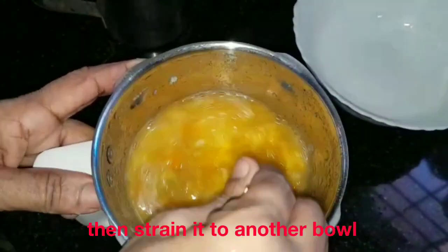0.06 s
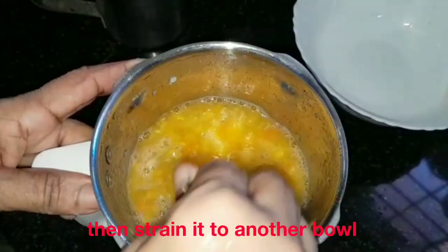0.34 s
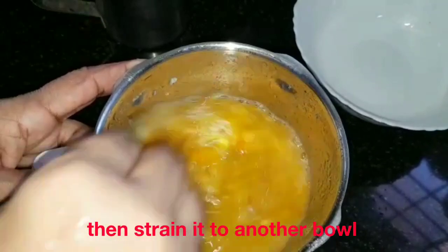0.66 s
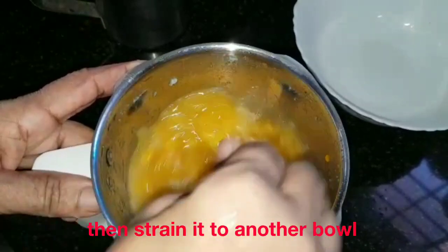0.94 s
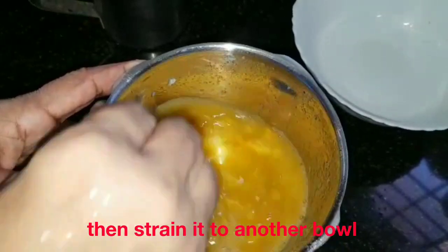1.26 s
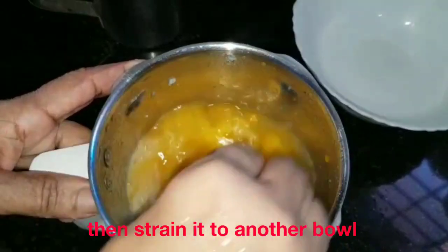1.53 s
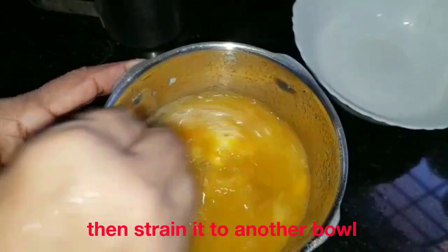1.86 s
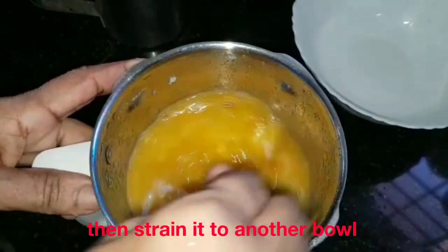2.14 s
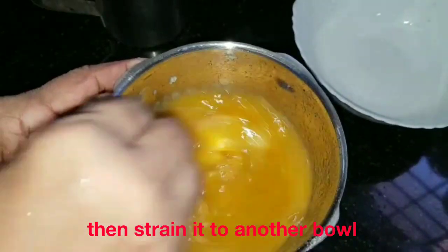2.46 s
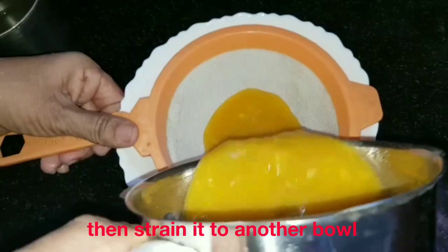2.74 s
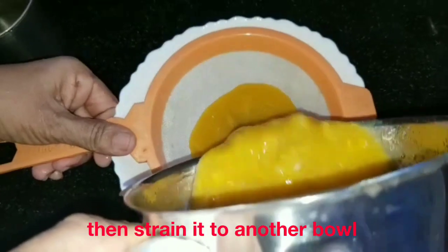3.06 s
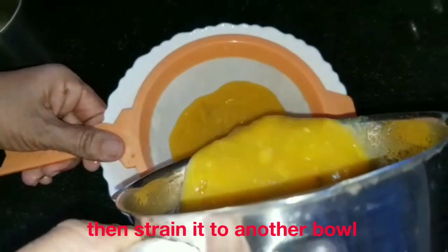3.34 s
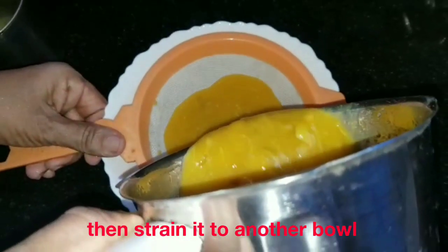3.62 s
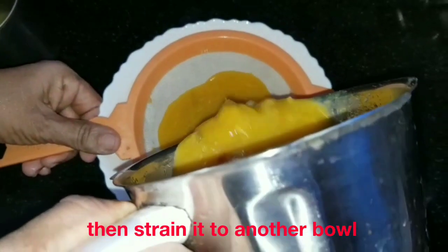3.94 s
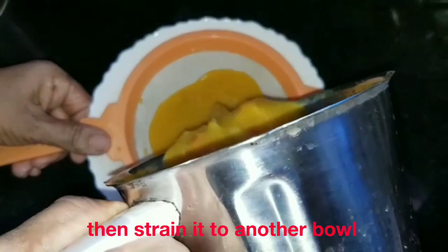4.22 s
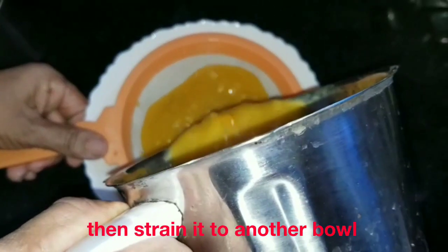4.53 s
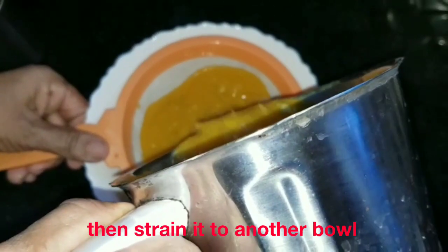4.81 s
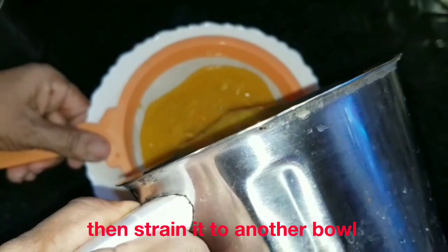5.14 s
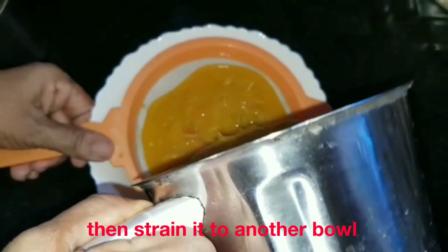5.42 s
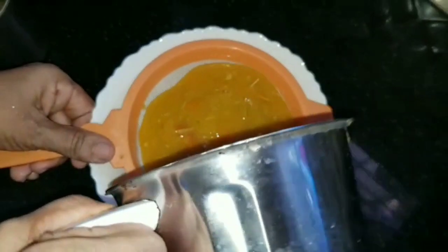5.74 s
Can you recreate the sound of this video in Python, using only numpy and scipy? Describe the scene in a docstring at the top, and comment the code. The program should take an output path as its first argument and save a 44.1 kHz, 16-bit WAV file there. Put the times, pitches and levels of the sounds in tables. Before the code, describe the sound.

Close up in a small kitchen, wet paste gurgles and smacks as fingers work it around a metal jar, air pockets popping with a short hollow ring. The stirring cuts off, and the paste starts sliding out into a plastic strainer: first quiet, sticky ticks, then a run of wet plops as blobs fall from the rim. A faint hum and room rumble lie underneath.

```python
"""Wet vegetable paste is stirred by hand in a steel blender jar: air pockets pop, the paste squelches, and the
air modes of the jar resonate. Then the scene changes, after a brief gap of total silence: the jar pours into a
plastic strainer, blobs tear off and plop, and the sliding film crackles. The pitched sounds are damped
oscillations of enclosed air; the smacks and clicks are ruptures of wet film. A small kitchen reverberates
around them, with a faint rumble and a low hum that swells at the start and again during the pour."""
import sys
import numpy as np
from scipy import signal
from scipy.fft import rfft, irfft, next_fast_len
from scipy.io import wavfile
from scipy.ndimage import uniform_filter1d, map_coordinates

SR = 44100
rng = np.random.default_rng(int(sys.argv[2]) if len(sys.argv) > 2 else 0)


def inscribe(sig):
    """Save sig as 16-bit PCM at rate SR to the path in sys.argv[1].

    A 1-D sig is mono; a 2-D sig holds one channel per row.
    Samples are clipped to [-1, 1] before scaling.
    """
    pcm = np.round(np.clip(np.atleast_2d(sig).T, -1, 1) * 32767)
    wavfile.write(sys.argv[1], SR, pcm.astype(np.int16))


N = 254633
TIME = np.arange(N) / SR

# Paste squeezed between the fingers:
# (centre time [s], Gaussian width [s], level [dB], relative spit level [dB], spit resonance [Hz])
SQUEEZES = [(0.01, 0.016, -44, -3.5, 2690), (1.109, 0.028, -46.5, 3, 4630), (1.19, 0.016, -43, 1.5, 3800),
            (1.807, 0.0081, -37.5, -3.5, 4740), (1.86, 0.014, -41.5, 5, 2830),
            (1.893, 0.007, -39.5, 7.5, 3160), (2.679, 0.0078, -36, -11.5, 2030)]
# Films snapping: (time [s], level [dB], relative smack level [dB], resonance [Hz])
FILM_SNAPS = [(0.033, -35.5, -3, 11370), (0.967, -34.5, -22.5, 5800), (1.03, -27, -16.5, 3220),
              (1.036, -25.5, -9.5, 6250), (1.417, -57.5, 21, 2020), (1.613, -26, -12, 3320),
              (2.2034, -27.5, -24, 12540), (2.865, -47, -18, 11430), (2.922, -40.5, -1, 2410),
              (3.002, -47, -3, 5950), (3.2002, -38.5, -3.5, 3160), (3.2912, -38, -12, 3150),
              (3.3246, -36, -19, 12000), (3.432, -46.5, -19, 10460), (3.485, -45, 4.5, 6830),
              (3.6451, -31.5, -2.5, 3010), (3.807, -31.5, 0, 5400), (3.827, -24.5, -6.5, 4770),
              (4.298, -37, -5, 6950), (4.714, -34.5, -5.5, 11500), (5.016, -35.5, -3.5, 11500),
              (5.078, -42, 3.5, 11000), (5.1551, -33, -16.5, 11500), (5.353, -34, -6, 3290),
              (5.595, -33.5, -3.5, 6140), (5.623, -36, -18, 12300)]
# Air pockets opened by the fingers; smack, snap and thud are offsets from the level:
# (time [s], level [dB], pitch [Hz], smack [dB], snap [dB], thud [dB], pitch of air under the hand [Hz])
AIR_POCKETS = [(0.188, -38, 934, -15.5, -21.5, -1.5, 418), (0.233, -36.5, 790, -27, -28.5, -7.5, 400),
               (0.488, -33.5, 785, -17, -22.5, -8, 990), (0.538, -11.5, 812, -11, -24.5, -16.5, 867),
               (0.716, -16.5, 930, -8, -21.5, -23.5, 740), (0.795, -21, 828, -17, -16.5, -18.5, 920),
               (0.829, -30, 925, -3.5, -6.5, -20, 735), (1.007, -37.5, 840, 5.5, -16, -19, 1420),
               (1.126, -19.5, 835, -5, -22.5, -20, 1273), (1.2151, -15, 1030, -12.5, -13.5, -5, 386),
               (1.2195, -10, 826, -8, -20, -21, 870), (1.283, -24, 826, -27, -30, -9, 497),
               (1.385, -27, 813, -36.5, -50, -6.5, 955), (1.59, -17, 707, -10.5, -13.5, -18, 1144),
               (1.683, -15, 784, -22.5, -30, -17.5, 422), (1.761, -18.5, 880, -13.5, -23.5, -16.5, 914),
               (1.776, -29, 766, -2, -19, -34, 850), (1.806, -21.5, 927, -21.5, -28.5, -19, 990),
               (1.928, -22.5, 804, -32, -28, -49, 820), (1.948, -30.5, 742, -6.5, -11.5, -12, 776),
               (2.194, -33, 876, -5, -20, -19, 900), (2.301, -28, 930, -9.5, -23, -10.5, 1050),
               (2.307, -26.5, 660, -17.5, -30.5, -16.5, 685), (2.477, -24, 830, -11, -24.5, -21, 816),
               (2.534, -17.5, 770, -17, -22.5, -21.5, 862), (2.638, -24, 878, -13, -26.5, -27, 1060)]
# Bubble strings drawn in behind the fingers: (start [s], end [s], first level [dB], last level [dB],
# first pitch [Hz], last pitch [Hz], first rate [1/s], last rate [1/s])
BUBBLE_STRINGS = [(0.301, 0.478, -57, -37, 730, 823, 59.7, 130.6),
                  (1.832, 1.899, -30.5, -32.5, 950, 1020, 202, 326.6)]
# Strokes of the hand: (time of full push [s], hold [s], gurgle level [dB], smear level [dB])
HAND_STROKES = [(0.8, 0.07, -56.5, -57), (1.21, 0.017, -39, -68), (1.776, 0.14, -46.5, -56.5),
                (2.264, 0.015, -45, -62.5), (2.647, 0.06, -50.5, -69)]
# Hard pushes that jolt the jar on the counter: (time [s], level [dB])
JAR_JOLTS = [(0.56, -48), (1.25, -54.5), (1.61, -54), (2.56, -56.5)]
# Air forced through gaps in the paste: (centre time [s], Gaussian width [s], level [dB], resonance [Hz])
GAP_SQUEAKS = [(0.935, 0.0079, -54.5, 1800), (2.133, 0.0034, -49.5, 1800), (3.55, 0.0029, -46, 3140)]
# Swells of the hum: (time when full [s], hold [s], level [dB])
HUM_SWELLS = [(0.28, 0.02, -58.5), (3.91, 0.54, -58.5), (4.09, 0.034, -54)]
# Hollow tones of the tipped jar: (time when full [s], hold [s], level [dB], frequency [Hz])
JAR_TONES = [(2.76, 0.061, -66.5, 437), (2.73, 0.081, -64.5, 1260), (3.066, 0.67, -75, 721),
             (3.51, 0.047, -63.5, 1240)]
# Blobs tearing off the rim; smack and snap are offsets from the level:
# (time [s], level [dB], pitch [Hz], smack [dB], snap [dB], small bubble [Hz], snap resonance [Hz])
BLOBS = [(3.635, -23.5, 1154, -14, -9.5, 2310, 5500), (3.7337, -29, 1050, -7, -1.5, 2320, 5500),
         (3.774, -23.5, 970, -9.5, -17, 2350, 6000), (3.916, -31.5, 853, -12.5, -34, 1800, 6000),
         (3.962, -36.5, 945, -18, -5.5, 1750, 4500), (3.986, -23.5, 950, -2.5, -10.5, 1750, 7500),
         (4.04, -32.5, 1180, 4, 3, 1890, 9000), (4.1473, -30, 1160, 2, 4.5, 2380, 12000),
         (4.238, -24.5, 967, -16.5, -20, 1650, 4000), (4.5, -29.5, 854, -18, -16, 1740, 6000),
         (4.52, -32.5, 810, -6.5, -4.5, 1860, 11500), (4.546, -31, 800, -2.5, 3.5, 1906, 12000),
         (4.8066, -19.5, 964, -18.5, -19.5, 1630, 12500), (4.887, -19, 900, -3.5, -11.5, 1500, 5000),
         (4.975, -36, 920, 6.5, 4, 1592, 12500), (5.2658, -21.5, 970, -2.5, -6, 1615, 12000),
         (5.416, -21.5, 946, -3.5, -9.5, 1308, 8000), (5.4557, -26, 905, -3.5, -4, 2540, 11500),
         (5.5, -25, 884, -17.5, -22, 1480, 8000), (5.567, -16, 814, -21, -16.5, 1406, 11500)]

# Resonant modes: (frequency [Hz], bandwidth [Hz], gain [dB])
JAR_MODES = [(401, 3.2, 5), (434, 5.5, 2.5), (686, 7.3, -1.5), (885, 14, -5), (1230, 43, 2),
             (1462, 20, -0.5), (2052, 8.2, -4)]  # air in the jar
BOWL_MODES = [(863, 32, 4), (1197, 51, -0.5), (1565, 35, -4.5), (2436, 17, 4.5)]  # air between jar and bowl
COUNTER_MODES = [(97, 5.9, 6)]  # boom of the counter

# Source spectra: (frequency [Hz], relative spectral density [dB])
THUD_SPECTRUM = [(100, -25.5), (250, -13.5), (420, -0.5), (600, -5.5), (1000, -13.5), (3000, -91)]  # dull part of a pop
SMACK_SPECTRUM = [(400, -20), (900, 0.5), (1400, 2.5), (2050, 2), (2500, -3.5), (4500, -8.5), (9000, -40.5)]  # wet midrange of a rupture
SNAP_SPECTRUM = [(800, -38), (2500, -5.5), (6500, 1), (9000, -6.5), (14000, -2), (16000, -28.5)]  # film tearing in the jar
GURGLE_SPECTRUM = [(150, -24), (400, -18.5), (600, -6), (860, 2), (1050, 1.5), (1400, -19.5), (3000, -49)]  # bubbles in pushed paste
SLOSH_SPECTRUM = [(110, -22), (160, 10), (240, 0), (480, 3.5), (650, 1), (1100, -38.5)]  # jolted paste
CRACKLE_SPECTRUM = [(1200, -25), (2400, -3.5), (3500, -7), (6000, -3.5), (9000, -7), (13000, -4.5),
                    (15000, -15), (16000, -24.5)]  # film tearing on the rim
FLOW_SPECTRUM = [(400, -45), (620, 2), (900, 3.5), (1600, 1.5), (2400, -19.5), (4500, -39.5)]  # sliding bulk of the paste
RUMBLE_SPECTRUM = [(20, -23), (50, -1.5), (85, 3), (130, -7), (182, 0.5), (262, -8.5), (500, -19.5),
                   (900, -64)]  # room and handling rumble
AIR_SPECTRUM = [(100, -9), (650, -5.5), (2400, -15), (4000, -24.5), (13000, -20.5), (16000, -41)]  # faint room hiss

# Reverberation of the kitchen: (frequency [Hz], decay time T60 [s])
KITCHEN_T60 = [(100, 0.87), (900, 0.44), (3000, 0.49), (8000, 0.31)]

STIR_END_S, POUR_START_S = 2.697, 2.731
POP_CYCLES, POP_GLIDE = 2.28, 0.32  # periods to peak amplitude; fractional excess of the initial pitch
JAR_TEAR_S, RIM_TEAR_S = 0.00047, 0.00061  # time a film takes to tear


def amp(db):
    """Amplitude ratio of a level in decibels."""
    return 10 ** (np.asarray(db) / 20)


def unit(x):
    """Normalisation to rms 1."""
    return x / np.sqrt(np.mean(x ** 2) + 1e-20)


def along(points, hz):
    """Interpolation of (frequency [Hz], value) points on a logarithmic frequency axis."""
    freqs, values = np.transpose(points)
    return np.interp(np.log(hz + 1), np.log(freqs + 1), values)


def wobble(knots_per_s):
    """Random modulation: a spline through Gaussian values."""
    return map_coordinates(rng.standard_normal(int(N * knots_per_s / SR) + 4), [TIME * knots_per_s])


def pulse(centre_s, width_s):
    """Gaussian envelope of peak 1."""
    return np.exp(-((TIME - centre_s) / width_s) ** 2 / 2)


def swells(rows, rise_db_per_s, fall_db_per_s):
    """Power summation of exponential rises and falls, given as (time [s], hold [s], level [dB])."""
    power = np.zeros(N)
    for s, hold, db in rows:
        rise_db = rise_db_per_s * np.maximum(s - TIME, 0)
        fall_db = fall_db_per_s * np.maximum(TIME - s - hold, 0)
        power += amp(db - rise_db - fall_db) ** 2
    return np.sqrt(power)


def add(track, s, sound):
    """Superposition of a sound on the track at time s."""
    part = track[:, max(round(s * SR), 0):][:, :sound.shape[-1]]
    part += sound[..., :part.shape[-1]]


def filtered(x, response):
    """Linear filtering: the spectrum is multiplied by a frequency response."""
    n = x.shape[-1]
    padded = next_fast_len(n + 8192)
    return irfft(rfft(x, padded) * response(np.fft.rfftfreq(padded, 1 / SR)), padded)[..., :n]


def coloured(x, spectrum):
    """Minimum-phase filtering: folding the cepstrum makes the response causal."""
    def response(hz):
        cepstrum = irfft(np.log(amp(along(spectrum, hz))))
        half = len(cepstrum) // 2
        return np.exp(rfft(np.r_[cepstrum[0], 2 * cepstrum[1:half], np.zeros(half)]))
    return filtered(x, response)


def resonator(f, hz, width, db):
    """Band-pass response of a damped oscillator driven at frequency f."""
    return amp(db) * 1j * f * width / (hz * hz - f * f + 1j * f * width)


def resonate(x, modes):
    """Modal superposition: each mode responds independently to the drive x."""
    return filtered(x, lambda f: sum(resonator(f, *mode) for mode in modes))


def peaked(x, hz, q, mode_db):
    """Resonant emphasis: the response of one mode adds to the direct sound."""
    return filtered(x, lambda f: 1 + resonator(f, hz, hz / q, mode_db))


def reverb(x, t60s, delay_s):
    """Diffuse field: a noise tail decays exponentially, each frequency at its own rate."""
    hz, t, bins = signal.stft(rng.standard_normal((2, SR // 2)), SR, nperseg=256)
    tail = signal.istft(bins * amp(-60 * t / along(t60s, hz)[:, None]), SR, nperseg=256)[1]
    tail = np.pad(tail / np.linalg.norm(tail[0]), ((0, 0), (int(delay_s * SR), 0)))
    return signal.fftconvolve(x, tail, axes=1)[:, :N]


def noise(n, coherence):
    """Partially coherent stereo white noise; the common part leads on the left by up to six samples."""
    common = rng.standard_normal(n)
    arrivals = np.array([common, np.roll(common, rng.integers(0, 7))])
    return np.sqrt(coherence) * arrivals + np.sqrt(1 - coherence) * rng.standard_normal((2, n))


def grains(spectrum, per_s, spread_db, coherence):
    """Shot noise of rms 1: tiny ruptures of uneven size occur as a Poisson process."""
    onsets = rng.random(N) < per_s / SR
    sizes = amp(spread_db * np.minimum(rng.standard_exponential(N), 3))
    return unit(coloured(onsets * sizes * noise(N, coherence), spectrum))


def burst(spectrum, life_s, coherence, rise_s=0.00051, cell=None):
    """Exponentially decaying noise; an air cell (frequency [Hz], Q, gain [dB]) may resonate in it."""
    t = np.arange(SR // 20) / SR
    decay = np.exp(-t / life_s)
    onset = 1 - np.exp(-(t / rise_s) ** 2)
    x = coloured(decay * onset * noise(len(t), coherence), spectrum)
    if cell is not None:
        x = peaked(x, *cell)
    return x * np.sqrt(2 * np.sum(decay ** 2) / np.sum(x ** 2))


def pocket(hz, swell_s, glide, left_db, lead_rad):
    """Cavity resonance: the pitch sinks as an air pocket widens, and the paste soon damps it."""
    age = np.arange(SR // 20) / SR / swell_s
    phase = 2 * np.pi * np.cumsum(hz * (1 + glide * np.exp(-2 * age))) / SR
    envelope = age * np.exp((1 - age * age) / 2)
    side = np.array([[.5], [-.5]])
    return amp(side * left_db) * envelope * np.sin(phase + side * lead_rad)


def ring(hz, t60_s, attack_s):
    """Damped oscillation of one air mode."""
    t = np.arange(SR // 5) / SR
    return np.sin(2 * np.pi * hz * t) * amp(-60 * t / t60_s) * (1 - np.exp(-t / attack_s))


def room_tone():
    """Ambient noise: faint hiss, and a hum of two harmonics whose swells also raise the rumble."""
    swell = swells(HUM_SWELLS, rise_db_per_s=166, fall_db_per_s=90)
    rumble = unit(coloured(noise(N, coherence=0.78), RUMBLE_SPECTRUM))
    hiss = unit(coloured(noise(N, coherence=0.27), AIR_SPECTRUM))
    phase = 2 * np.pi * np.cumsum(98.3 + 1.08 * wobble(14)) / SR
    hum = amp(2.6 * wobble(23.94)) * np.sin(phase) + amp(-2) * np.sin(2 * phase)
    return np.hypot(amp(-69.5), amp(-5.5) * swell) * rumble + amp(-69) * hiss + swell * hum


def handling():
    """Forced vibration: the hand and its jolts drive the counter, and the paste sloshes at each jolt."""
    jolts = swells([(s, 0, db) for s, db in JAR_JOLTS], rise_db_per_s=448.5, fall_db_per_s=75)
    grip = amp(-68) * (TIME < STIR_END_S)
    shake = coloured(noise(N, coherence=1), RUMBLE_SPECTRUM)
    boom = unit(shake + resonate(shake, COUNTER_MODES))
    slosh = grains(SLOSH_SPECTRUM, per_s=740, spread_db=1, coherence=0.62)
    return np.hypot(jolts, grip) * boom + jolts * amp(-1 + 9 * wobble(34.55)) * slosh


def squirts():
    """Paste squeezed between the fingers emits pulses of shot noise: low bubbling and a bright spit."""
    x = np.zeros((2, N))
    bubbles = grains(GURGLE_SPECTRUM, per_s=1100, spread_db=1.5, coherence=0.7)
    spit = grains(SMACK_SPECTRUM, per_s=1800, spread_db=2.5, coherence=0.98)
    spit += amp(-8.5) * grains(SNAP_SPECTRUM, per_s=2100, spread_db=2.5, coherence=0.21)
    for s, width, db, spit_db, spit_hz in SQUEEZES:
        tuned_spit = unit(peaked(spit, spit_hz, q=11, mode_db=5.5))
        x += amp(db - 2) * pulse(s, width) * (bubbles + amp(spit_db) * tuned_spit)
    return x


def film_snaps(rows, spectrum, tear_s, snap_db):
    """Rupture of a thin wet film radiates a sharp click and a longer smack."""
    x = np.zeros((2, N))
    for s, db, smack_db, hz in rows:
        click = burst(spectrum, life_s=2 * tear_s, coherence=0.44, rise_s=tear_s, cell=(hz, 3.4, 7))
        smack = burst(SMACK_SPECTRUM, life_s=0.0046, coherence=0.19, rise_s=tear_s)
        add(x, s, amp(db) * (amp(snap_db) * click + amp(smack_db - 8.5) * smack))
    return x


def pops():
    """Impulsive excitation: an air pocket opens and rings, as does the air under the hand."""
    x = np.zeros((2, N))
    for s, db, hz, smack_db, snap_db, thud_db, trapped_hz in AIR_POCKETS:
        lead_in = burst(SMACK_SPECTRUM, life_s=0.004, coherence=0.32, rise_s=0.002)
        snap = burst(SNAP_SPECTRUM, life_s=0.004, coherence=0.26)
        smack = burst(SMACK_SPECTRUM, life_s=0.0028, coherence=0.47, cell=(1983, 24, 0.5))  # jar mode
        thud = burst(THUD_SPECTRUM, life_s=0.0055, coherence=0.8)
        escape = min(trapped_hz / 876, 1)  # deeper rings escape less well
        add(x, s - 0.004, amp(db - 26) * lead_in)  # a soft, brief swell leads into each pop
        add(x, s - 0.0005, amp(db + snap_db + 3) * snap)
        add(x, s, amp(db) * (amp(smack_db + 0.5) * smack + amp(thud_db - 2) * thud))
        add(x, s, amp(db - 3) * pocket(hz, POP_CYCLES / hz, POP_GLIDE, left_db=0.5, lead_rad=0.147))
        add(x, s, amp(db - 10.5) * escape * ring(trapped_hz, t60_s=0.057, attack_s=0.0026))
    return x


def afterbubbles():
    """Paste closing over each burst pocket sets three weaker, deeper bubbles oscillating."""
    x = np.zeros((2, N))
    mean_gap_s, max_drop_octaves, loss_db = 0.0086, 0.49, 4.5
    for s, db, pop_hz, *_ in AIR_POCKETS:
        for k, (gap, drop) in enumerate(rng.random((3, 2))):
            s += mean_gap_s * (.5 + gap)
            hz = pop_hz * 2 ** (-max_drop_octaves * drop)
            bubble = pocket(hz, POP_CYCLES / hz, POP_GLIDE, left_db=-3.5, lead_rad=0)
            add(x, s, amp(db - 21.5 - loss_db * k) * bubble)
    return x


def slurps():
    """Air entrainment behind the fingers forms strings of bubbles that quicken and rise in pitch."""
    x = np.zeros((2, N))
    for start, end, *ramps in BUBBLE_STRINGS:
        s = start
        for gap, size, detune in rng.standard_normal((60, 3)):
            if s >= end:
                break
            db, hz, rate = (np.interp(s, [start, end], ramp) for ramp in np.reshape(ramps, (-1, 2)))
            pitch = hz * np.exp(0.081 * detune)
            bubble = pocket(pitch, POP_CYCLES / hz, glide=0.28, left_db=0.5, lead_rad=0.21)
            add(x, s, amp(db + 2 * size) * bubble)
            s += np.exp(0.56 * gap) / rate
    return x


def strokes():
    """Amplitude-modulated shot noise: each stroke makes the paste gurgle and smears it on the steel."""
    gurgle = swells([row[:3] for row in HAND_STROKES], rise_db_per_s=101, fall_db_per_s=140.5)
    smear_rows = [(s, hold, db) for s, hold, _, db in HAND_STROKES]
    smear = swells(smear_rows, rise_db_per_s=102.5, fall_db_per_s=83.5)
    bubbles = grains(GURGLE_SPECTRUM, per_s=400, spread_db=2.5, coherence=0.58)
    smacks = grains(SMACK_SPECTRUM, per_s=1600, spread_db=8, coherence=0.25)
    snaps = grains(SNAP_SPECTRUM, per_s=580, spread_db=3, coherence=0.47)
    x = gurgle * amp(-2.5 + 3.85 * wobble(40.14)) * bubbles
    return x + smear * (amp(1.9 * wobble(36)) * smacks + amp(-0.5 + 3.1 * wobble(29.78)) * snaps)


def stirring():
    """Source and filter: the paste drives the jar's air modes and reflects from jar and kitchen."""
    snaps = [row for row in FILM_SNAPS if row[0] < STIR_END_S]
    x = slurps() + afterbubbles() + film_snaps(snaps, SNAP_SPECTRUM, JAR_TEAR_S, snap_db=0)
    x += pops() + strokes() + squirts()
    walls = amp(-5) * reverb(x, [(400, 0.14), (8000, 0.12)], delay_s=0.004)
    kitchen = amp(-10.5) * reverb(x, KITCHEN_T60, delay_s=0.008)
    x += walls + resonate(x, JAR_MODES) + kitchen
    muffled = filtered(x, lambda hz: 1 / np.sqrt(1 + (hz / 10980) ** 4))  # deep under the hand
    return muffled * amp([[.6], [-.6]])  # the jar stands a little to the left


def squeaks():
    """Air passing a narrow gap in the paste excites its broad resonance with a stream of tiny bursts."""
    x = np.zeros((2, N))
    bursts = (rng.random(N) < 1500 / SR) * noise(N, coherence=1)
    for s, width, db, hz in GAP_SQUEAKS:
        gap = [(hz, 0.23 * hz, 0)]
        x += amp(db) * pulse(s, width) * unit(resonate(resonate(bursts, gap), gap))
    return x + amp(-2) * reverb(x, KITCHEN_T60, delay_s=0.011)


def jar_tones(q=12):
    """Noise-driven resonance: faint hollow tones come and go as the jar is shifted."""
    x = np.zeros((2, N))
    for s, hold, db, hz in JAR_TONES:
        mode = [(hz, hz / q, 0)]
        tone = unit(resonate(resonate(noise(N, coherence=0.67), mode), mode))
        x += swells([(s, hold, db)], rise_db_per_s=129, fall_db_per_s=69) * tone
    return x


def sliding_film(clicks_per_s=35):
    """Random ruptures in the film, a dense fizz and sparse clicks, grow louder as it gathers speed."""
    level_db = np.interp(TIME, [2.4, 3.23], [-83, -65]) + 0.61 * wobble(27)
    fizz = grains(CRACKLE_SPECTRUM, per_s=3700, spread_db=1, coherence=0.38)
    sizes = (rng.random(N) < clicks_per_s / SR) * rng.random(N) ** 2
    decays = signal.lfilter([1], [1, -np.exp(-1 / (2 * RIM_TEAR_S * SR))], sizes)
    clicks = unit(coloured(decays * noise(N, coherence=0.68), CRACKLE_SPECTRUM))
    return amp(level_db) * (amp(-5) * fizz + amp(-1) * clicks)


def plops(froth_fall_db_per_s=188):
    """Each blob tearing off the rim excites two bubble resonances and leaves sizzling froth."""
    x, froth = np.zeros((2, N)), np.zeros((1, N))
    for s, db, hz, smack_db, snap_db, bubble_hz, snap_hz in BLOBS:
        cycles = 1.62 - 0.09 * smack_db  # the weaker its smack, the longer a blob rings
        plop = pocket(hz, cycles / hz, glide=0.039, left_db=2.5, lead_rad=0.69)
        smack = burst(SMACK_SPECTRUM, life_s=0.0056, coherence=0.71, rise_s=RIM_TEAR_S)
        bubble = ring(bubble_hz, t60_s=0.036, attack_s=0.0015)
        snap = burst(CRACKLE_SPECTRUM, life_s=0.0015, coherence=0.69, rise_s=RIM_TEAR_S,
                     cell=(snap_hz, 2.7, 1.5))
        add(x, s, amp(db) * (amp(-5.5) * plop + amp(smack_db - 9) * smack + amp(snap_db + 2) * snap))
        add(x, s, amp(db + smack_db - 5) * bubble)
        add(froth, s, amp(db + snap_db - 28 - froth_fall_db_per_s * TIME[:SR // 2]))
    return x + froth * grains(CRACKLE_SPECTRUM, per_s=3700, spread_db=6, coherence=0.35)


def flow():
    """Shot noise of moving paste: the bulk flow and the drag behind each blob add in power."""
    bulk = amp(-65.5 - 17 * np.interp(TIME, [4, 3.565], [1, 0]))  # steps up by 17 dB during the pour
    drag = swells([(s, 0, db - 40.5) for s, db, *_ in BLOBS], rise_db_per_s=268, fall_db_per_s=120)
    squelch = grains(FLOW_SPECTRUM, per_s=530, spread_db=10, coherence=0.71)
    return np.hypot(bulk, drag) * amp(wobble(28)) * squelch


def pouring():
    """Source and filter: the pour drives the air between jar and bowl, and reverberates."""
    snaps = [row for row in FILM_SNAPS if row[0] > POUR_START_S]
    x = film_snaps(snaps, CRACKLE_SPECTRUM, RIM_TEAR_S, snap_db=1.1) + sliding_film() + plops() + flow()
    walls = amp(-3.5) * reverb(x, [(800, 0.089), (8000, 0.037)], delay_s=0.0033)
    kitchen = amp(-5.5) * reverb(x, KITCHEN_T60, delay_s=0.008)
    return x + jar_tones() + walls + resonate(x, BOWL_MODES) + kitchen


def scene():
    """Superposition of all sources, gated to silence between the stirring and the pour."""
    before = uniform_filter1d(1.0 * (TIME < STIR_END_S), size=400)
    after = uniform_filter1d(1.0 * (TIME > POUR_START_S), size=400)
    paste = before * stirring() + after * pouring()
    return paste + (before + after) * (squeaks() + handling() + room_tone())


def record(dry):
    """Interchannel level difference favours the left in the midrange; the band ends at 16.2 kHz."""
    balance = [(100, 1.1), (400, 3), (900, 1.1), (2000, 3), (4000, -3), (8000, 0)]  # left over right
    side = np.array([[.5], [-.5]])
    return filtered(dry, lambda hz: amp(side * along(balance, hz)) * (hz < 16200))


dry = scene()
out = record(dry)
inscribe(out)
```